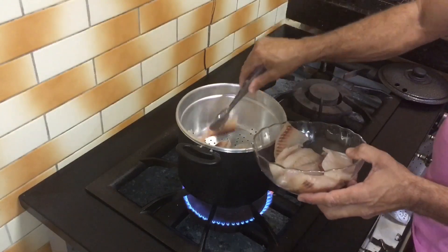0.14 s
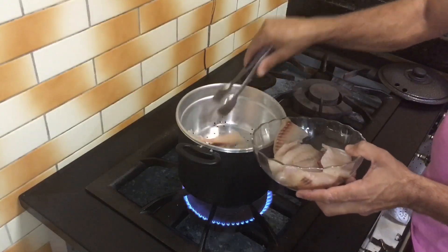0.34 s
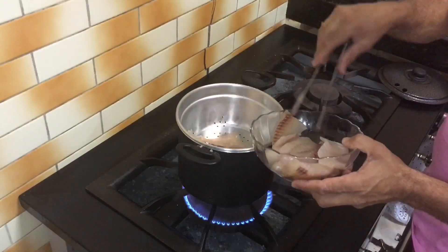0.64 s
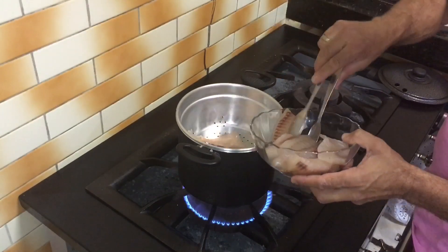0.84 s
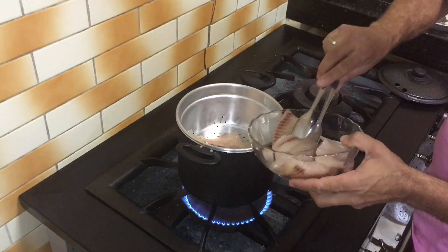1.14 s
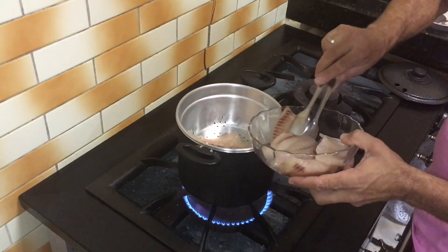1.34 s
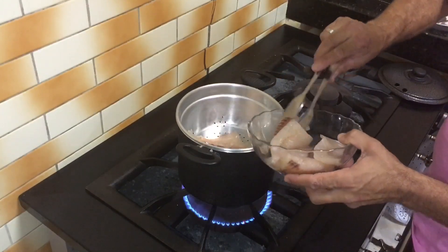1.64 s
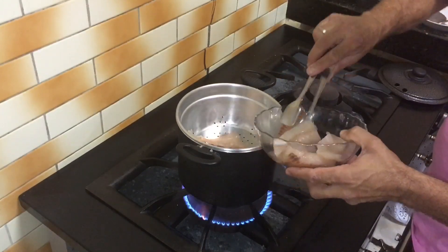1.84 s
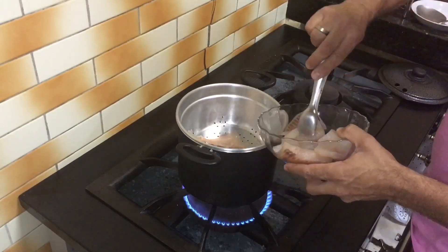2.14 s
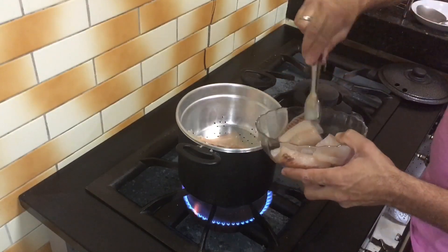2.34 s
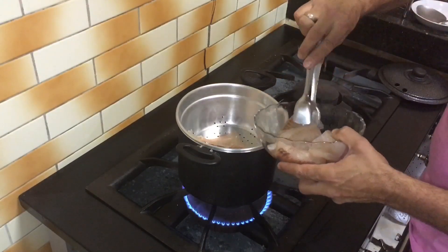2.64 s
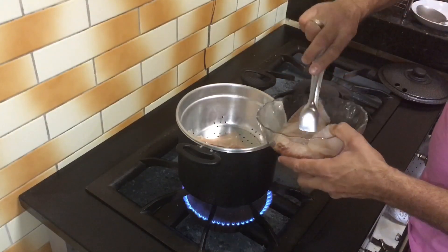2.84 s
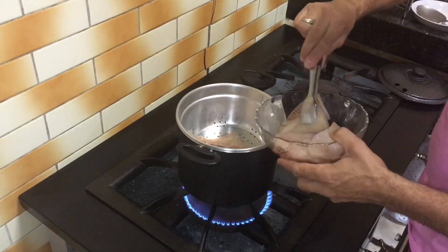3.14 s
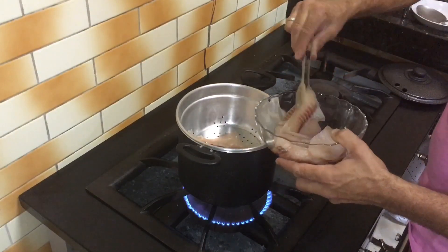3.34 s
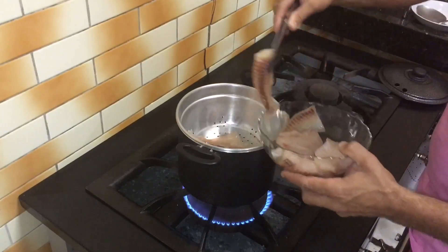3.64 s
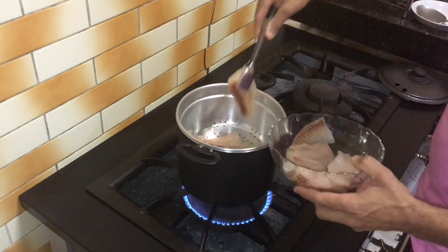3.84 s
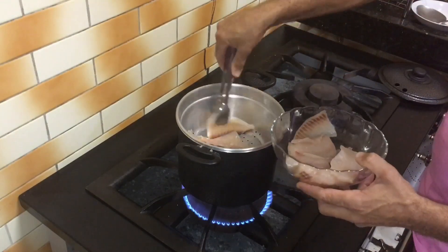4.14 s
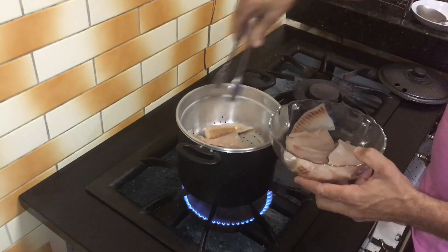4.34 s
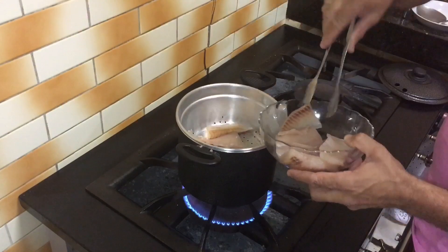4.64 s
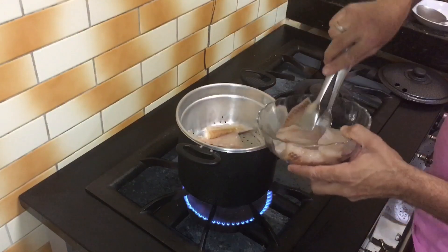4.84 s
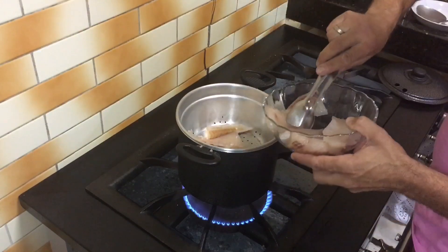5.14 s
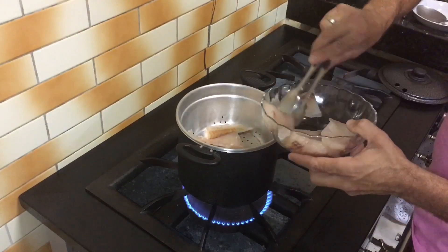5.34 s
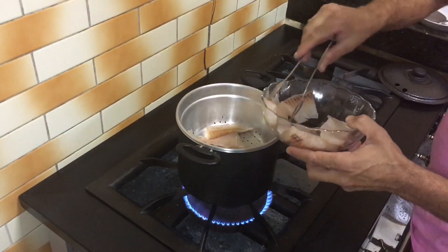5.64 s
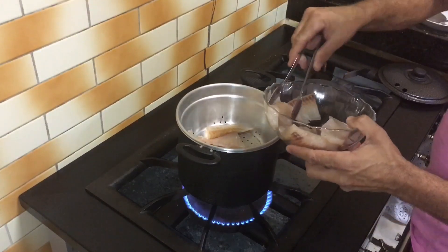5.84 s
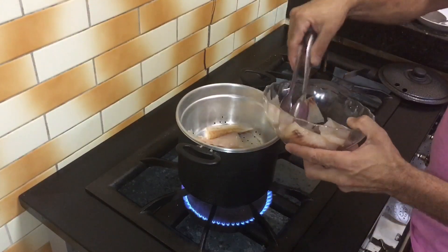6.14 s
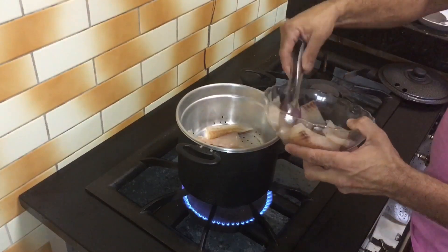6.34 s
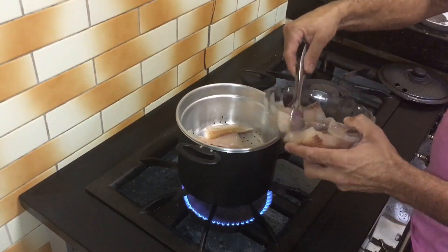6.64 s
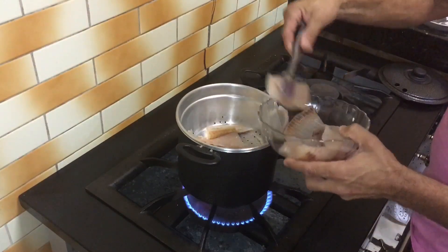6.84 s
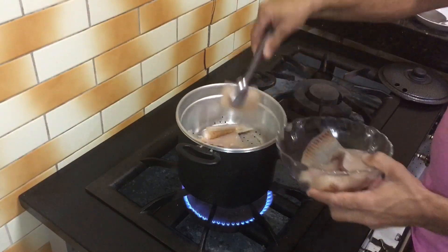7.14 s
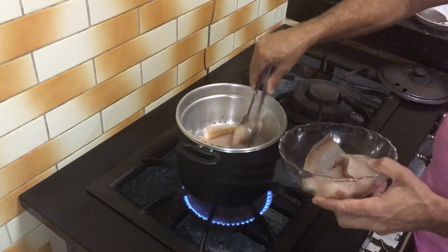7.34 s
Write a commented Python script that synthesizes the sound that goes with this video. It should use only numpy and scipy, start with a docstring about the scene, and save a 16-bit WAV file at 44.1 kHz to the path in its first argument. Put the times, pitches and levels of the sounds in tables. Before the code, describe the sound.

Close in a small tiled kitchen, a lit gas burner gives a steady low rumble, wavering hum and faint hiss. Steel tongs tap and scrape lightly in a glass bowl while wet fish clicks and peels. Past the middle comes the hardest metallic clack, with a dull knock and short singing note. Lighter contacts and rubs follow, ending with a bright tap on glass.

```python
"""Steel tongs move raw fish from a glass bowl into an aluminium steamer on a lit gas stove.
Throughout, shaped noise makes the burner rumble and hiss over sine hum lines and a swelling drone.
Early on the tongs tap, slide and clack as damped noise and ringing modes; the wet fish clicks and peels.
The hardest clack comes past the middle, with a dull sine knock of the steamer and a singing note;
lighter contacts and rubs follow, then a bright tap on the bowl. Small tiled walls answer every touch."""
import sys
import numpy as np
from scipy import signal
from scipy.fft import rfft, irfft, next_fast_len
from scipy.io import wavfile
from scipy.ndimage import map_coordinates

SR = 44100
rng = np.random.default_rng(int(sys.argv[2]) if len(sys.argv) > 2 else 0)


def store_wav(level_fs):
    """Save 16-bit WAV to argv[1]."""
    pcm = np.round(np.clip(np.atleast_2d(level_fs), -1, 1) * 32767)
    wavfile.write(sys.argv[1], SR, pcm.T.astype(np.int16))


N = 330660

# the rumble of the flame, relative spectrum: freq_hz, density_db (per Hz)
FLAME_SPECTRUM = [(12, -74), (20, -23), (32, -20), (65, -12), (92, 0.5), (114, -5.5), (131, -8), (196, -8),
                  (226, -18.5), (271, -16.5), (477, -23.5), (608, -26.5), (1200, -32), (2500, -44.5),
                  (3500, -60)]
# booms of the stove and the room: centre_hz, width_hz, lift_db
BOOMS = [(36.8, 3.8, -3.5), (52.4, 29, 14), (63, 5.7, -3.5), (98, 19, 0.5), (124, 12, -4.5), (138, 15, 2.5),
         (163, 17, -6.5), (178.7, 25, 7.5), (186.5, 9.1, -4), (220, 11, -2.5), (253, 13, 3.5),
         (271.5, 18, 3.5), (395, 48.7, 4), (404, 7.3, -1), (475, 28.2, -7)]
FLAME_DB = -44.5  # rms
# steady hum lines: pitch_hz, level_db (rms, before a slow wobble)
HUM_LINES = [(51, -61.5), (178, -64.5), (204.5, -58)]
# a thin overtone of the hum that comes and goes: time_s, level_db (rms)
OVERTONE_LEVEL = [(0, -62), (2.2, -70), (3.4, -61.5), (3.9, -62), (5.7, -60.5), (6.3, -63.5), (7.5, -65)]
# the hiss of the gas jet, relative spectrum: freq_hz, density_db (per Hz)
JET_SPECTRUM = [(1200, -36), (2400, 0), (5000, -4.5), (6300, 1.5), (8200, -2), (9300, 4.5), (10500, -3.5),
                (13000, 2), (15700, 4), (16000, -6)]
# resonances of the burner tube: centre_hz, width_hz, lift_db
TUBE_RESONANCES = [(2590, 110, 12.5), (3190, 91, 9.5), (3465, 45, 12.5), (3874, 81, 10.5), (4240, 59, 8.5),
                   (4600, 110, 7), (4800, 70, 5.5), (6106, 83, 15.5), (6380, 190, 4.5), (7600, 180, 3),
                   (12600, 160, 5.5), (14550, 1200, 2.5)]
# slow swelling of the drone around DRONE_DB: time_s, gain_db
DRONE_SWELL = [(0.0, 7), (0.4, -2.0), (0.65, 2.5), (0.85, -3), (1.65, -4.5), (1.95, 6), (2.15, -7.5),
               (2.7, 4), (3.55, -2.5), (4.3, 4), (4.65, -3.5), (5.55, 0.5), (5.95, -0.5), (6.45, 1),
               (7.1, -0.5), (7.49, -6)]
DRONE_HZ, DRONE_WIDTH_HZ, DRONE_DB = 102.4, 8.9, -44.5  # level is rms before the swell
DRONE_STEADINESS = 0.3  # 0 beats freely, 1 holds its level

# decay of the tiled kitchen: freq_hz, t60_s
KITCHEN_DECAY = [(500, .36), (2500, .36), (6000, .31), (10000, .24), (15000, .19)]

# the clearest wet clicks of the fish: start_s, peak_db
WET_CLICKS = [(0.246, -41), (1.522, -38), (1.535, -34), (1.5445, -34.5), (3.1848, -39), (3.2626, -37.5),
              (3.497, -39), (3.6845, -43), (3.716, -38)]
# the tongs work a piece loose and it crackles: start_s, length_s, peak_db (typical click)
PEELS = [(1.557, 0.26, -49), (2.85, .12, -46)]
WET_HZ, CLICKS_PER_S, CLICK_SCATTER_DB = 9300, 22, 1
# tongs slide on fish and glass: start_s, length_s, rub_db, centre_hz, fizz_db (rms before the fades)
RUBS = [(0.523, 0.18, -62.5, 3450, -65), (0.995, 0.12, -61, 2120, -62), (1.55, 0.17, -84, 5000, -65),
        (3.187, 0.034, -60, 2800, -62), (4.878, 0.33, -62.5, 5300, -60), (5.98, 0.076, -64, 2340, -78),
        (6.147, 0.046, -60.5, 5300, -59), (6.426, 0.083, -52.5, 2650, -58)]
FIZZ_HZ = 11500
RUB_OVERTONE_DB = -4.5  # an octave above the centre, relative to the rub

# dull knocks of the steamer and the bowl: start_s, level_db (sine before onset and decay), pitch_hz
KNOCKS = [(0.2783, -47, 1000), (0.8225, -41.5, 1010), (3.0605, -44.5, 1170), (4.238, -45, 950),
          (4.5252, -26.5, 998), (4.794, -38, 1100), (5.0424, -38.5, 1010), (6.331, -36, 1170)]
# one mode left singing, the steamer's rim (lowest) or an arm of the tongs:
# start_s, level_db (before onset and decay), pitch_hz
SINGING = [(0.823, -34, 2466), (1.238, -47, 3772), (4.5245, -31, 1364), (4.794, -49, 3840),
           (5.572, -51, 2440), (5.7, -45.5, 1345), (6.489, -51.5, 1364)]
SING_T60_S = 0.21

# contacts of the tongs: start_s, level_db (at the pivot, before the arms' lift),
# thinness_db (lost per octave below the pivot), hardness_db (gained per octave above it),
# steel_db, glass_db (gain of each ring in the blow)
CONTACTS = [(0.2767, -61.5, 1.5, 7, -25, -21), (0.823, -34.5, 7.5, 12, -12.5, -25),
            (0.9223, -47, 11, 2, -18, -24), (1.132, -53, 4, 4.5, -16, -17), (1.1875, -60, 0, 6, -6, -30),
            (1.237, -53.5, 8, 1, -13, -28), (1.4346, -46.5, 2.5, 10, -7, -51),
            (2.4325, -34, 12, 7, -42, -40), (3.0584, -64, 5, 15.5, -22, -7), (4.524, -18, 12.5, -3, 2, -44),
            (4.7929, -32, 7, 1.5, -4.5, -17), (4.8307, -40.5, 9, 2, -10, -35),
            (4.9406, -57.6, 11, -3, 3, -21.5), (5.0424, -47, 3.5, 6, -23, -36),
            (5.5717, -50, 2, -4, -6, -33), (5.6982, -33.5, 9.5, 1.5, -10, -24),
            (6.33, -36.5, 6.5, 11, -38, 0), (6.487, -60.5, 4, 6.5, 3, -8),
            (6.5707, -61.5, 2.5, -10, -27, -17)]
# registers in which the tongs speak: low_hz, high_hz
REGISTERS = [(1150, 2000), (2000, 3000), (3000, 4500), (4500, 8000), (8000, 16000)]
# dense, quickly damped resonances of the tongs: centre_hz, width_hz, lift_db (scaled down when pressed)
BODY_RESONANCES = [(1436, 72, 21), (1690, 280, 22.5), (2060, 243, -19), (2514, 91, 19.5), (3073, 280, -7),
                   (3833, 300, 9), (4343, 300, -4), (5300, 240, 12.5), (5820, 350, 1.5), (6270, 1300, 15),
                   (6720, 240, 2.5), (9000, 240, 22), (9560, 600, 7), (11840, 2400, 16.5), (13480, 1540, 9),
                   (15040, 350, 10), (14800, 590, 11.5)]
# lasting ring of tongs and steamer; the two arms give close pairs that beat:
# pitch_hz, level_db (relative), t60_s
STEEL_MODES = [(1374, -14, 0.22), (1608, -12.5, 0.0904), (1778, -13, 0.11), (2420, -15, 0.13),
               (2480, -21, 0.38), (3740, -8.5, 0.1), (3837, -12.5, 0.11), (3768, -7.5, 0.17), (5244, 1, .1),
               (5280, 1.5, 0.12), (5330, -19, 0.22), (5650, -17, 0.087), (6280, -14, .14),
               (6980, -3.5, 0.1), (6990, -6, 0.16), (9350, -18.5, 0.16), (9630, -10, 0.13),
               (11600, -6.5, 0.091), (10960, 1, 0.1305), (12050, 4, .1), (12180, -2.5, 0.098),
               (12910, -4, 0.082), (13070, -8.5, .08), (15200, -10, .11)]
# ring of the bowl, damped by fish and hand: pitch_hz, level_db (relative), t60_s
GLASS_MODES = [(1240, 9, 0.054), (2520, 9.5, 0.055), (3335, -14, 0.43), (3380, -11.5, 0.157),
               (3770, 5.5, 0.0182), (6540, -13.5, 0.16), (9300, 3, .07), (9340, -1.5, 0.074),
               (11400, -2, 0.14), (10800, -5, 0.056)]
PIVOT_HZ = 6000
ARM_HZ, ARM_OCTAVES = 2450, 0.4  # the bending resonance of the arms and its spread
ARM_DB, PRESS_DB = 1.5, 11  # its lift in free tongs, and how far it drops when they are pressed

TOP_HZ = 16400  # upper limit of the whole scene


def amp(db):
    """Decibels to gain."""
    return 10 ** (np.asarray(db) / 20)


def unit(x):
    """Scale to rms 1."""
    return x / np.sqrt(np.mean(x ** 2) + 1e-20)


def along(points, hz):
    """Read (Hz, value) points on a log frequency axis."""
    f, v = np.transpose(points)
    return np.interp(np.log(hz + 1), np.log(f + 1), v)


def level(points):
    """Turn (s, dB) points into a gain per sample."""
    return amp(np.interp(np.arange(N) / SR, *np.transpose(points)))


def fade(t, t60):
    """A decay of 60 dB in t60 seconds."""
    return np.exp(-np.log(1000) * t / t60)


def wobble(rate):
    """A smooth random curve with rate knots a second."""
    knots = rng.standard_normal(int(N * rate / SR) + 4)
    return map_coordinates(knots, [np.arange(N) * rate / SR])


def add(track, s, sound):
    """Mix a sound into the track at time s."""
    part = track[max(round(s * SR), 0):][:len(sound)]
    part += sound[:len(part)]


def band(x, lo, hi, order=2):
    """Causal band-pass."""
    sos = signal.butter(order, [lo, min(hi, SR / 2 - 1000)], "band", fs=SR, output="sos")
    return signal.sosfilt(sos, x)


def filtered(x, response):
    """Shape x with a gain that depends on frequency."""
    m = next_fast_len(x.shape[-1] + SR // 4)
    spectrum = rfft(x, m) * response(np.fft.rfftfreq(m, 1 / SR))
    return irfft(spectrum, m)[..., :x.shape[-1]]


def rush(spectrum, resonances, count=N):
    """Noise of rms 1 with a broad spectrum and narrow resonances on it."""
    def response(hz):
        db = along(spectrum, hz)
        for centre, width, lift_db in resonances:
            db = db + lift_db / (1 + (2 * (hz - centre) / width) ** 2)
        return amp(db)
    return unit(filtered(rng.standard_normal(count), response))


def in_kitchen(sound, wet_db):
    """Add the answer of the tiled walls: noise dying by frequency, drawn anew at each call."""
    hz, t, z = signal.stft(rng.standard_normal(SR // 2), SR, nperseg=256)
    decay = fade(t, along(KITCHEN_DECAY, hz)[:, None])
    build_up = 1 - np.exp(-t / 0.004)
    walls = signal.istft(z * decay * build_up, SR, nperseg=256)[1]
    walls *= amp(wet_db) / np.linalg.norm(walls)
    walls[0] += 1  # the direct sound
    return signal.fftconvolve(sound, walls)


def flame():
    """Turbulent burning: low noise coloured by the booms of stove and room."""
    return amp(FLAME_DB) * rush(FLAME_SPECTRUM, BOOMS)


def drone():
    """A narrow air resonance fed with noise: it beats at random under a slow swell, its pitch wanders."""
    def resonance(hz):
        return 1 / np.sqrt(1 + (2 * (hz - DRONE_HZ) / DRONE_WIDTH_HZ) ** 4)
    air = signal.hilbert(filtered(rng.standard_normal(N), resonance))
    steadied = air.real / np.abs(air) ** DRONE_STEADINESS  # evens out the beating
    return amp(DRONE_DB) * level(DRONE_SWELL) * unit(steadied)


def tone(hz, waver):
    """A hum line of rms 1 whose phase wanders by about waver radians."""
    phase = 2 * np.pi * hz * np.arange(N) / SR + waver * wobble(7.9)
    return np.sqrt(2) * np.sin(phase)


def hum():
    """Wavering low sine lines and a thin overtone that comes and goes."""
    out = level(OVERTONE_LEVEL) * tone(307.5, waver=0.86)
    for hz, db in HUM_LINES:
        out += amp(db + 0.83 * wobble(4.0)) * tone(hz, waver=0.8)
    return out


def gas_jet():
    """Gas hisses through the burner tube: noise with the tube's resonances, its level gently wobbling."""
    gain = amp(-62.5 + 0.67 * wobble(3.23))
    return gain * rush(JET_SPECTRUM, TUBE_RESONANCES)


def stove():
    """Rumble, drone, hum and hiss run together as the bed."""
    return flame() + drone() + hum() + gas_jet()


def add_wet_clicks(track):
    """Wet flesh parts in short bright noise bursts, alone or scattered through a peel."""
    t = np.arange(SR // 10) / SR
    clicks = list(WET_CLICKS)
    for s, length, db in PEELS:
        for _ in range(round(length * CLICKS_PER_S)):
            clicks.append((s + length * rng.random(), db + CLICK_SCATTER_DB * rng.standard_normal()))
    for s, db in clicks:
        hz = WET_HZ * np.exp(0.087 * rng.standard_normal())
        burst = rng.standard_normal(len(t)) * np.sqrt(t) * fade(t, 0.012)
        click = band(burst, hz / 1.03, hz * 1.85)
        add(track, s, amp(db) * click / np.abs(click).max())


def add_rubs(track):
    """Sliding is a train of tiny random slips, heard in a centre band, its octave and a high fizz."""
    for s, length, rub_db, centre_hz, fizz_db in RUBS:
        count = int(length * SR)
        strength = rng.standard_normal(count) * np.sqrt(rng.exponential(size=count))
        slips = strength * (rng.random(count) < 7000 / SR)  # about 7000 slips a second
        layers = [(centre_hz, rub_db), (2 * centre_hz, rub_db + RUB_OVERTONE_DB), (FIZZ_HZ, fizz_db)]
        for hz, db in layers:
            rub = unit(band(slips, hz / 1.12, hz * 1.155, order=1))
            add(track, s, amp(db) * rub * np.hanning(count))


def fish():
    """Wet flesh clicks as it parts and rubs under the tongs in many tiny slips."""
    out = np.zeros(N)
    add_wet_clicks(out)
    add_rubs(out)
    return in_kitchen(out, wet_db=-6.5)[:N]


def knocks():
    """A blunt blow pushes the whole vessel, which the hand or the pot below damps at once."""
    out, t = np.zeros(N), np.arange(SR // 10) / SR
    onset = 1 - np.exp(-t / 0.00047)
    for s, db, hz in KNOCKS:
        thud = np.sin(2 * np.pi * hz * t) * fade(t, 0.037)
        puff = unit(band(rng.standard_normal(len(t)), hz / 1.25, hz * 1.6))
        thud += amp(-7.5) * puff * fade(t, 0.0339)
        add(out, s, amp(db) * thud * onset)
    return in_kitchen(out, wet_db=-9.0)[:N]


def singing():
    """A blow on the antinode of a mode leaves that one clear note ringing."""
    out, t = np.zeros(N), np.arange(SR // 2) / SR
    envelope = (1 - np.exp(-t / 0.001)) * fade(t, SING_T60_S)
    for s, db, hz in SINGING:
        add(out, s, amp(db) * np.sin(2 * np.pi * hz * t) * envelope)
    return in_kitchen(out, wet_db=-12.5)[:N]


def ring(modes, t):
    """Decaying modes; each blow lands elsewhere and shares its energy a little differently."""
    hz, db, t60 = np.transpose(modes)[:, :, None]
    scatter_db = rng.standard_normal((len(modes), 1))
    phase = 2 * np.pi * (hz * t + rng.random((len(modes), 1)))
    return np.sum(amp(db + scatter_db) * np.sin(phase) * fade(t, t60), axis=0)


def register_db(hz, thinness, hardness, damping):
    """Light contacts lack the low registers, hard ones favour the top; pressing stills the arms."""
    octaves = np.log2(hz / PIVOT_HZ)
    tilt_db = octaves * (thinness if octaves < 0 else hardness)
    arms = np.exp(-(np.log2(hz / ARM_HZ) / ARM_OCTAVES) ** 2)
    return tilt_db + (ARM_DB - PRESS_DB * damping) * arms


def tongs():
    """Each contact is a dense, quickly damped clack plus the ring of steel and glass."""
    out, t = np.zeros(N), np.arange(int(0.6 * SR)) / SR
    attack = int(0.03 * SR)  # samples over which each register is levelled
    onset = 1 - np.exp(-t / 0.00037)
    for s, level_db, thinness, hardness, steel_db, glass_db in CONTACTS:
        # tongs pressed into fish and glass are muted, and their resonances colour the clack less
        free = np.interp(steel_db, [-30, -6], [0.3, 1])
        damping = np.interp(max(steel_db, glass_db), [-22, -7], [1, 0])
        body = np.array(BODY_RESONANCES) * [1, 1, free]
        noise = rush([(800, 0.0025), (16000, 0.0033)], body, count=len(t))  # all but flat under the body
        clack = amp(11) * fade(t, 0.035) * noise
        rings = amp(steel_db) * ring(STEEL_MODES, t) + amp(glass_db) * ring(GLASS_MODES, t)
        blow = in_kitchen(onset * clack, wet_db=-8.5)
        blow += in_kitchen(onset * rings, wet_db=-10.5)
        # the place and hardness of the contact set how strongly each register speaks
        for lo, hi in REGISTERS:
            register = band(blow, lo, hi, order=4)
            db = level_db + register_db(np.sqrt(lo * hi), thinness, hardness, damping)
            add(out, s, amp(db) * register / np.std(register[:attack]))
    return out


def scene():
    """Lay the contacts of fish, vessels and tongs over the stove, as one channel."""
    return (stove() + fish() + knocks() + singing() + tongs())[None]


def record(dry):
    """Cut everything above TOP_HZ with a 200 Hz wide slope."""
    return filtered(dry, lambda hz: np.clip((TOP_HZ - hz) / 200 + 0.5, 0, 1))


dry = scene()
out = record(dry)
store_wav(out)
```